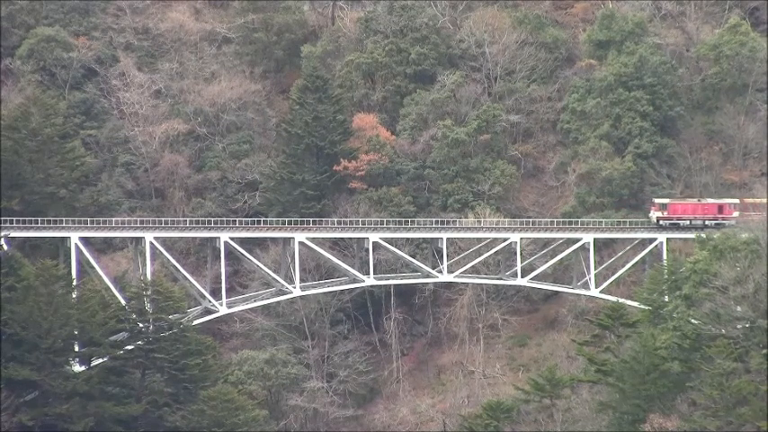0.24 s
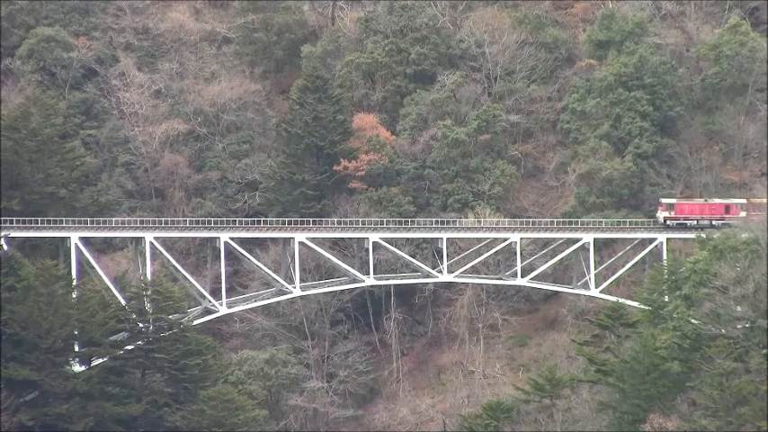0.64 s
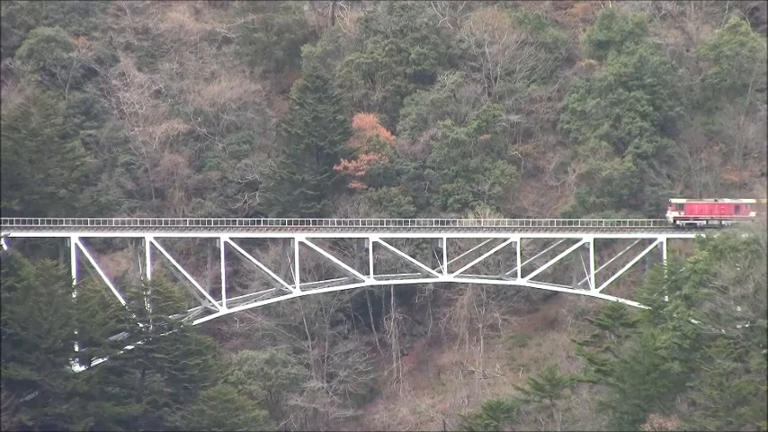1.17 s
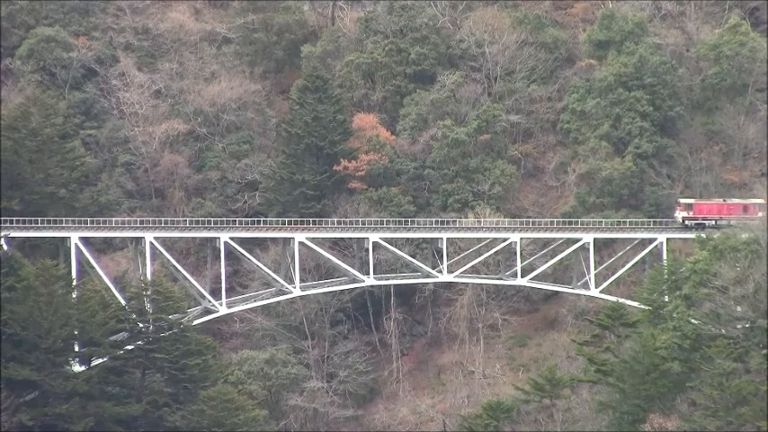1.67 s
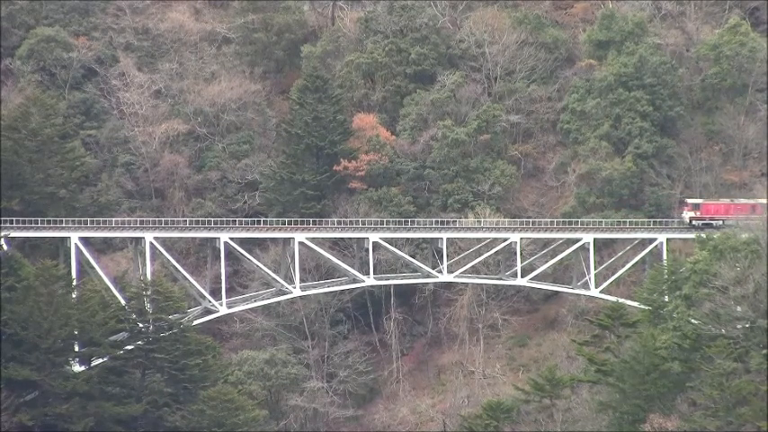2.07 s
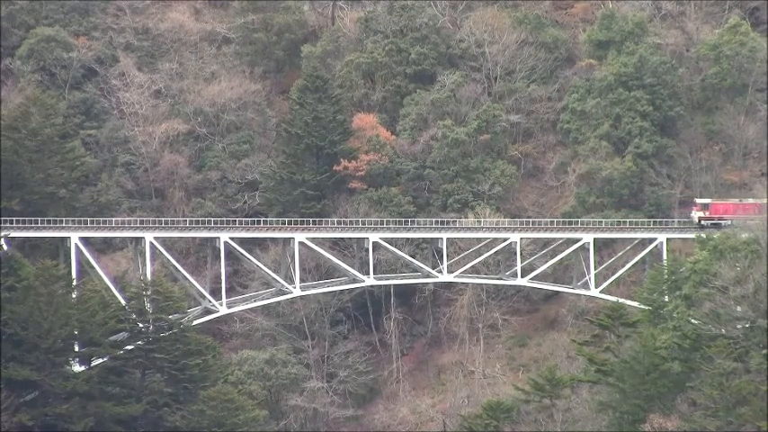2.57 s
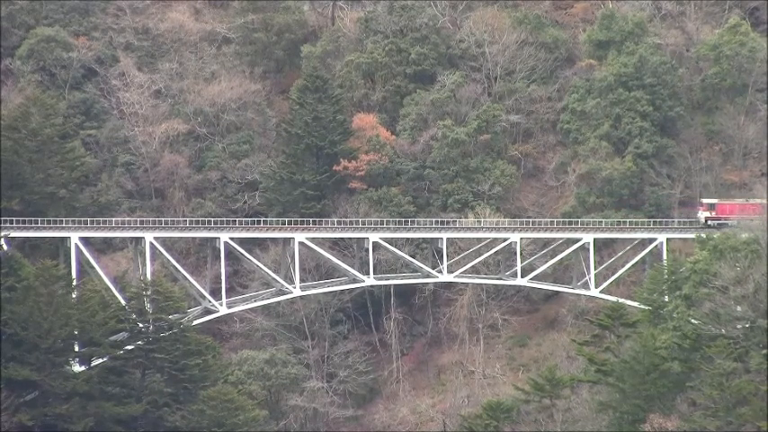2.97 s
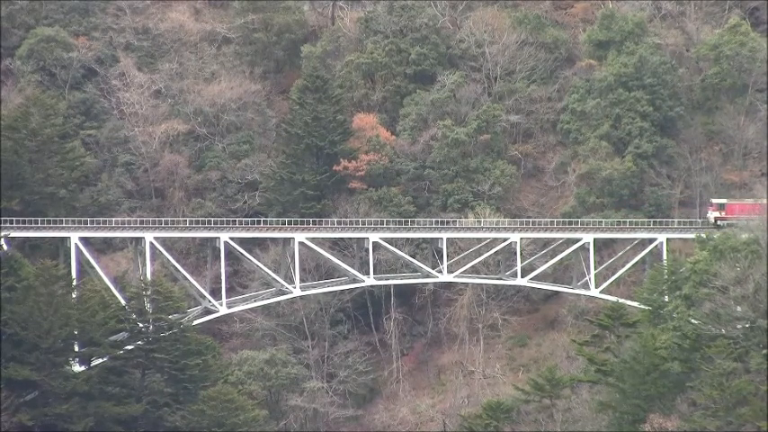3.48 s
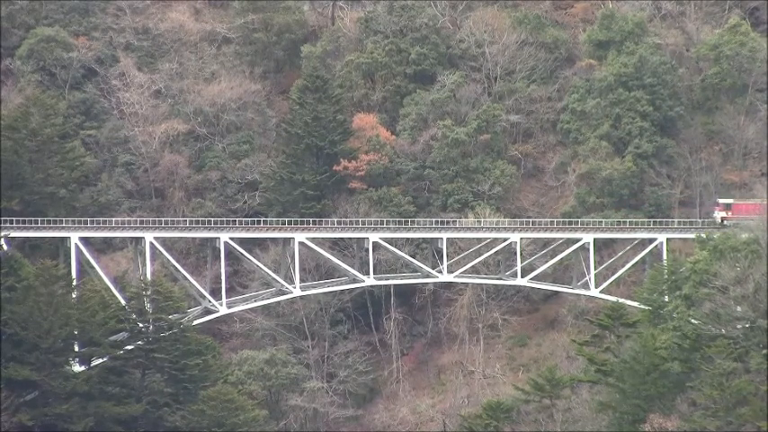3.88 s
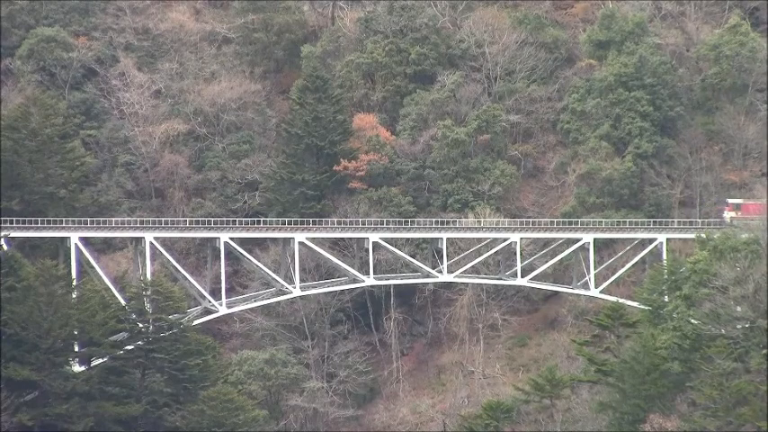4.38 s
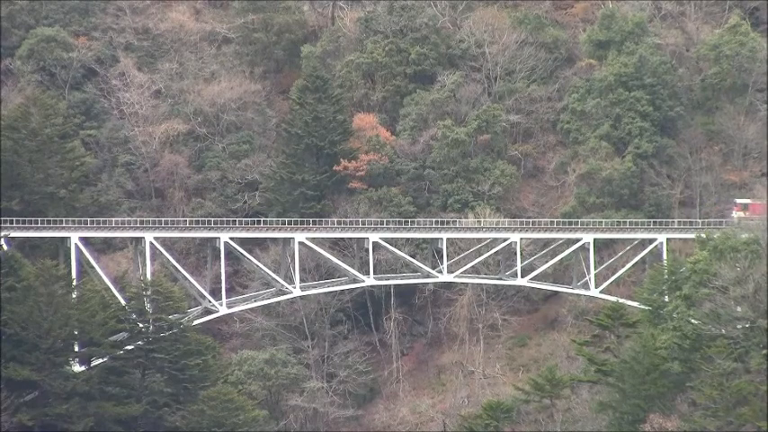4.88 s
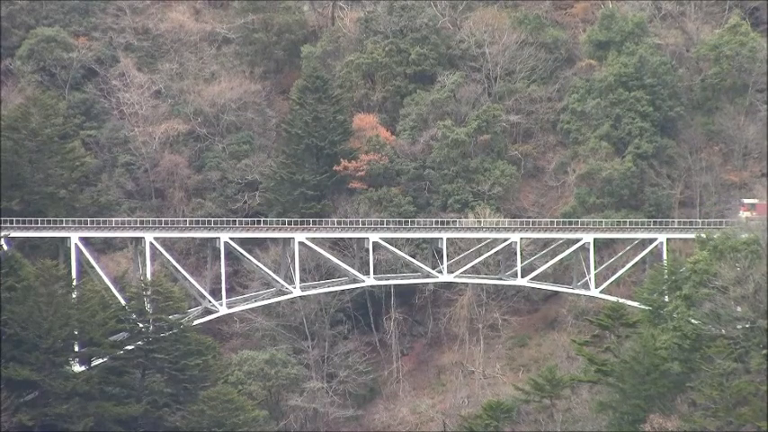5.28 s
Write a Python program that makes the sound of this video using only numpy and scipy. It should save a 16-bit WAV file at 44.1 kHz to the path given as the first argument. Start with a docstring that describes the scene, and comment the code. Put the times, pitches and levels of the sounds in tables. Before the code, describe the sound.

In a wooded valley, distant water rushes steadily, birds chirp with a soft echo and a far train drones very faintly. Close to the microphone, a reflex camera takes three evenly spaced pictures, each a sharp shutter clack with a brief motor whine. Gear knocks and a jacket rustles, a button clicks, and a latch snaps loudly shut. Everything turns quieter as a sleeve swishes amid more rustling and knocking.

```python
"""Distant water rushes in a wooded valley, a far train drones faintly, and birds call throughout.
Close by, a reflex camera takes three pictures: each time the mirror swings up, the shutter slams
and a motor winds on. Then gear knocks as it is handled and a jacket rustles. A button clicks and
a latch snaps shut, so loudly that the recorder turns itself down. Last, a sleeve swishes amid
more rustling and knocking."""
import sys
import numpy as np
from scipy import signal
from scipy.fft import rfft, irfft, next_fast_len
from scipy.io import wavfile
from scipy.ndimage import uniform_filter1d

SR = 44100
rng = np.random.default_rng(int(sys.argv[2]) if len(sys.argv) > 2 else 0)


def bounce(signal):
    """Save signal as a 16-bit WAV file at the path given by the first command-line argument."""
    frames = np.transpose(np.atleast_2d(signal))
    limited = np.clip(frames, -1, 1)
    pcm = np.round(limited * 32767).astype(np.int16)
    wavfile.write(sys.argv[1], SR, pcm)


N = 244297
TIME = np.arange(N) / SR
BLOW = TIME[:SR // 8]   # seconds since a blow

# How alike the two ears hear far and near sounds. Each row: frequency in Hz, likeness (1 = the same).
FAR = [(30, 0.93), (120, 0.64), (250, 0.34), (600, 0.42), (2000, 0.81), (5000, 1), (9000, 0.44),
       (15000, 0.11)]
NEAR = [(300, 1), (2000, 1), (4500, 0.97), (8000, 0.64), (14000, 0.13)]
# Tone of rattling springs and blades. Each row: frequency in Hz, level in dB.
RATTLE_TONE = [(240, -55), (400, -20.5), (879, -5.5), (1420, -8), (1650, 0), (2250, -4.5), (3020, -4.5),
               (3810, -6), (4650, -15), (5690, -5.5), (7400, -12.5), (14400, -24.5), (16000, -38.5)]
# Tone of camera parts grinding together. Each row: frequency in Hz, level in dB.
GRIND_TONE = [(350, -46), (600, -17), (2870, -4.5), (3480, 0), (4280, -8), (5120, -4), (5870, -10.5),
              (6550, -4), (8270, -16), (9110, -11), (14500, -27), (16000, -33.5)]
# Tone of a dry crack in gear or cloth. Each row: frequency in Hz, level in dB.
CRACK_TONE = [(250, -11), (700, -1.5), (1700, 1.5), (3500, -5), (6000, -11), (9000, -18), (15000, -35)]
# Movements in the jacket. Each row: start and length in seconds, then rubbing, pop and crack levels in dB.
MOVES = [(2.37, .25, -47, -32, -34.5), (2.86, .19, -56, -36, -35), (4.29, .26, -40.5, -26.5, -33),
         (4.91, .63, -46, -23, -32.5)]
MOVE_ATTACK_S, MOVE_RELEASE_S = .5, .62


def from_db(db):
    """Turn decibels into a number to multiply a sound by."""
    return 10 ** (np.asarray(db) / 20)


def rms_one(x):
    """Scale a sound so that its average power is 1."""
    return x / np.sqrt(np.mean(x ** 2) + 1e-20)


def at_hz(points, hz):
    """Read between the rows of a frequency table, giving each octave equal room."""
    known_hz, value = np.transpose(points)
    return np.interp(np.log(hz + 1e-3), np.log(known_hz), value)


def add(out, sound, s):
    """Mix a sound in, starting at s seconds."""
    at = int(np.clip(round(s * SR), 0, N - 1))
    out[..., at:at + sound.shape[-1]] += sound[..., :N - at]


def envelope(t, start, hold, attack, release, db):
    """A level that climbs 60 dB in `attack` seconds up to the start, holds, then falls 60 dB in `release`."""
    away = np.maximum(start - t, 0) / attack + np.maximum(t - start - hold, 0) / release
    return from_db(db - 60 * np.minimum(away, 3))


def drift(rate_hz, size=N):
    """A smooth random wander, about 1 in size; a higher rate wanders faster."""
    step = max(int(SR / rate_hz / 12), 1)
    memory = np.exp(-2 * np.pi * rate_hz * step / SR)
    white = rng.standard_normal(size // step + 42)
    slow = signal.lfilter([1], [1, -2 * memory, memory * memory], white)[40:]
    return np.interp(np.arange(size) / step, np.arange(len(slow)), rms_one(slow))


def colour(pair, tone, likeness):
    """Give two unrelated noises a tone and blend them into left and right, at power 1."""
    length = pair.shape[-1]
    size = next_fast_len(length)
    hz = np.fft.rfftfreq(size, 1 / SR)
    mid, side = rfft(pair, size) * from_db(at_hz(tone, hz))
    alike = np.clip(at_hz(likeness, hz), -1, 1)
    left_right = np.sqrt(1 + alike) * mid + np.sqrt(1 - alike) * side * [[1], [-1]]
    return rms_one(irfft(left_right, size)[:, :length])


def noise(tone, likeness, size=N):
    """Smooth stereo noise with the given tone."""
    return colour(rng.standard_normal((2, size)), tone, likeness)


def grains(per_s, spread_db, size=N):
    """Friction: tiny slips of uneven size at random moments, in two unrelated streams."""
    out = np.zeros(2 * size)
    count = max(int(2 * per_s * size / SR), 1)
    when, heft, side = rng.random(size=(count, 3)).T
    out[(when * len(out)).astype(int)] = np.sign(side - .5) * from_db(-spread_db * np.log(heft + .05))
    return out.reshape(2, size)


def water_and_train(water_db=-44):
    """Distant water rushes steadily under the wavering drone of a far train."""
    # Tone of the water. Each row: frequency in Hz, level in dB.
    water_tone = [(13, -35), (22, -9), (50, -5), (74, 1.5), (115, -1.5), (242, 0), (319, -2), (602, -4),
                  (1100, -7.5), (1380, -10), (2450, -10), (2740, -10), (4260, -15), (5770, -17),
                  (13200, -25), (16000, -30.5)]
    # The train's low notes. Each row: pitch in Hz, level in dB.
    train_notes = [(67, -67), (159, -60.5), (232, -59.5)]
    train = sum(from_db(db) * drift(2.9) * np.sqrt(2) * np.sin(2 * np.pi * hz * TIME)
                for hz, db in train_notes)
    return from_db(water_db) * noise(water_tone, FAR) + train


def call(length, hz, glide, rough, droop=.035, third_db=-15, fourth_db=-22):
    """One hoarse, gliding whistle that droops at both ends; its second harmonic carries the pitch."""
    along = np.linspace(-1, 1, max(int(length * SR), 64))
    arch = 1 - droop * along ** 2
    pitch = hz * 2 ** (glide * along / 2) * arch * (1 + rough * drift(450, len(along)))
    phase = np.pi * np.cumsum(pitch) / SR   # turns at half the pitch
    voice = np.sin(2 * phase) + from_db(third_db) * np.sin(3 * phase)
    voice += from_db(fourth_db) * np.sin(4 * phase) * (pitch < 4000)
    flutter = from_db(3 * drift(120, len(along)))
    return rms_one(voice * flutter) * np.abs(np.cos(np.pi * along / 2)) ** .43


def valley(sound, echo_db, fade_s=.8):
    """Wooded slopes add a blurred echo that dies away by 60 dB in fade_s."""
    t = TIME[:SR]
    echo = noise([(20, 0), (20000, 0)], FAR, SR) * from_db(-60 * t / fade_s) * (1 - np.exp(-t / .02))
    echo /= np.sqrt(np.sum(echo ** 2) / 2)
    return sound + from_db(echo_db) * signal.oaconvolve(sound[None], echo, axes=1)[:, :N]


def birds(thin_hz=7520, thin_db=-53):
    """Nearer birds call one by one, and the valley echoes them."""
    # Each row: start and length in seconds, middle pitch in Hz, glide in octaves, level in dB.
    bird_calls = [(0, .056, 4740, .12, -40), (.041, .044, 3370, -.19, -39.5), (.124, .046, 3370, .05, -44),
                  (.252, .12, 3980, .5, -44), (.345, .089, 3550, .03, -44), (.94, .086, 4700, .25, -45),
                  (.984, .11, 3080, 0, -45), (1.122, .055, 5270, .4, -44), (1.15, .062, 3520, .05, -39),
                  (1.437, .2, 3900, .25, -47), (1.632, .096, 4150, 0, -41.5), (1.92, .12, 3060, -.15, -46),
                  (2.078, .079, 5300, .45, -51), (2.28, .04, 1830, .1, -45), (2.398, .064, 3920, 0, -45.5),
                  (3.141, .075, 3420, -.08, -46.5), (3.726, .088, 3590, .07, -45.5),
                  (4.415, .067, 4600, .19, -45), (4.45, .06, 3490, .04, -44), (4.777, .097, 3530, .24, -39),
                  (5.256, .087, 2820, 0, -48), (5.36, .096, 2900, .18, -44), (5.462, .03, 4450, -.45, -45)]
    calls = np.zeros(N)
    for s, length, hz, glide, db in bird_calls:
        add(calls, from_db(db) * call(length, hz, glide, rough=.028), s)
    for k in range(3):   # a small bird repeats one thin note, a little lower each time
        note = call(length=.09, hz=thin_hz - 130 * k, glide=0, rough=.009, droop=.025, third_db=-40)
        add(calls, from_db(thin_db) * note, s=.25 + .158 * k)
    return valley(calls, echo_db=-4.5)


def flock(lowest_hz=2620, octaves=.9, count=330):
    """Far birds overlap into a blur of echoes that swells with each bout of chatter."""
    # Each row: start in seconds, length in seconds, level in dB.
    bouts = [(0, .36, -45.7), (1, .7, -48), (2.3, .15, -47.7), (4.5, .12, -49), (4.95, .55, -54)]
    calls = np.zeros(N)
    for k, (late, pitch, slope) in enumerate(rng.random(size=(count, 3))):
        note = call(length=.06, hz=lowest_hz * 2 ** (octaves * pitch), glide=.4 * slope, rough=.06)
        add(calls, note, (k + late) / count * N / SR)
    swell = sum(envelope(TIME, s, length, attack=1.3, release=1.5, db=db) for s, length, db in bouts)
    return rms_one(valley(calls, echo_db=8)) * swell


def ringing(notes, sense, top_hz=10000):
    """A struck body rings at its own notes; a negative sense makes neighbouring notes swing opposite ways."""
    swing = sum(sense ** k * from_db(db - 60 * BLOW / fade_s) * np.sin(2 * np.pi * hz * BLOW)
                for k, (hz, db, fade_s) in enumerate(notes))
    # a small body gives off little below its lowest note; a blow takes time, which dulls the treble
    band_hz = [.8 * notes[0][0], top_hz]
    return signal.sosfilt(signal.butter(3, band_hz, "band", fs=SR, output="sos"), swing)


def strike(contacts, ring, tone, rattle_s, tail_db, tail_s, start=0):
    """Each contact rings the body and shakes loose parts; ground and bushes scatter a faint tail."""
    out = np.zeros((2, N))
    dying = from_db(-60 * BLOW / rattle_s) + from_db(tail_db - 60 * BLOW / tail_s)
    for s, ring_db, rattle_db, direction in contacts:
        rattle = noise(tone, NEAR, len(BLOW)) * dying
        add(out, np.sign(direction) * from_db(ring_db) * ring + from_db(rattle_db) * rattle, start + s)
    return out


def camera(lead_s=.12):
    """The mirror swings up and lands, the shutter slams, the motor winds on; every shot has the same blows."""
    # The pictures. Each row: shutter time in seconds, level of the blows in dB.
    shots = [(.7526, -1), (1.252, -1), (1.7408, -1.5)]
    # Blows in one shot. Each row: seconds after the shutter, ring in dB, rattle in dB, direction (1 or -1).
    contacts = [(-.073, -36.5, -37, 1), (-.0575, -29.5, -24.5, 1), (-.0525, -27.5, -40, -1),
                (-.0455, -13, -20.5, 1), (-.0400, -11.5, -18, -1), (-.0048, -18, -34, 1), (0, 0, -17, 1),
                (.00436, 4, -17, -1), (.043, -36, -34, 1), (.073, -18, -33, 1), (.129, -17, -29, 1)]
    # Notes of the camera body. Each row: pitch in Hz, level in dB, seconds to fade by 60 dB.
    body_notes = [(500, -33, 0.02), (750, -30, 0.014), (1070, -18.5, 0.0088), (1470, -13, .014),
                  (1690, -18.5, .014), (2540, -18, 0.023), (3230, -25, 0.015), (3600, -37.5, 0.0092),
                  (5160, -24.5, 0.014), (6500, -35, .009)]
    out = np.zeros((2, N))
    ring = ringing(body_notes, sense=-.99)
    blows = strike(contacts, ring, RATTLE_TONE, rattle_s=.023, tail_db=-18, tail_s=.12, start=lead_s)
    mirror_swing = envelope(BLOW - lead_s, start=-.058, hold=.017, attack=.12, release=.07, db=-34.5)
    for s, db in shots:
        friction = colour(grains(per_s=4000, spread_db=4, size=len(BLOW)), GRIND_TONE, NEAR)
        add(out, friction * mirror_swing, s - lead_s)
        add(out, from_db(db) * blows[:, :SR // 2], s - lead_s)
        add(out, motor(), s)
    return out


def motor(whine_hz=5130, gear_ratio=1.49, sag=.16, cocked_s=.113):
    """Two pairs of gears whine and their teeth grind; cocking the spring drags the pitch down."""
    t = TIME[:SR // 4]
    load_width_s = np.where(t < cocked_s, .018, .03)   # the load builds faster than it lets go
    load = np.exp(-((t - cocked_s) / load_width_s) ** 2)
    pitch = whine_hz * (1 - sag * load) * (1 + .021 * drift(400, len(t)))
    phase = 2 * np.pi * np.cumsum(pitch) / SR
    low = np.sin(phase) + from_db(-11) * np.sin(phase / 2) + from_db(-16) * np.sin(2 * phase)
    low *= envelope(t, start=.08, hold=.018, attack=.04, release=.11, db=-31.5)
    high = np.sin(gear_ratio * phase)
    high *= envelope(t, start=.104, hold=.021, attack=.02, release=.075, db=-30)
    teeth = colour(grains(per_s=5000, spread_db=4.6, size=len(t)), GRIND_TONE, NEAR)
    teeth *= envelope(t, start=.087, hold=.056, attack=.23, release=.12, db=-32.6)
    return np.sqrt(2) * (low + high) + teeth


def thud(hz, cycles=4.6):
    """A swing that dies away by 60 dB in the given number of cycles."""
    t = BLOW[:SR // 25]
    return np.sin(2 * np.pi * hz * t) * from_db(-60 * t * hz / cycles) * (1 - np.exp(-4 * t * hz))


def pop(hz, snap_db=-5, snap_ratio=3.13):
    """A dull thud with a briefer, higher snap on top."""
    return thud(hz) + from_db(snap_db) * thud(snap_ratio * hz)


def crack(fade_s):
    """A dry burst of noise that dies away by 60 dB in fade_s."""
    t = BLOW[:SR // 25]
    return noise(CRACK_TONE, NEAR, len(t)) * from_db(-60 * t / fade_s)


def handling(low_hz=330, high_hz=720, clack_hz=1740, clack_s=.02):
    """Handled gear knocks with a pop and a crack; twice a loose part clacks and bounces."""
    # Each row: start in seconds, pop level in dB, crack level in dB.
    knocks = [(2.245, -49, -28.5), (2.5368, -28, -31), (2.89, -38, -34), (4.2651, -39, -26),
              (4.2865, -30, -25), (4.5703, -28, -26), (4.6588, -22, -28), (4.9403, -25, -24),
              (4.9461, -16, -27), (4.9593, -23, -19.5), (5.053, -20, -33), (5.0758, -18, -29),
              (5.101, -19, -35), (5.19, -23, -25), (5.213, -21, -30), (5.3185, -21, -35), (5.335, -19, -32),
              (5.4125, -19.5, -37)]
    # Each row: start in seconds, level in dB.
    clacks = [(3.701, -29), (3.7068, -31), (4.563, -29), (4.567, -29)]
    out = np.zeros((2, N))
    for (s, pop_db, crack_db), pitch in zip(knocks, rng.random(len(knocks))):
        hz = low_hz * (high_hz / low_hz) ** pitch
        add(out, from_db(pop_db) * pop(hz) + from_db(crack_db) * crack(fade_s=.008), s)
    for s, db in clacks:
        add(out, from_db(db) * thud(clack_hz, cycles=clack_hz * clack_s), s)
    return out


def folds(low_hz=280, high_hz=1150, gap_s=.021, spread_db=3.5, pan_db=2.5, count=280):
    """While the jacket moves, its folds buckle one after another, each with a pop and a small crack."""
    out = np.zeros((2, N))
    wait, pitch = rng.random(size=(count, 2)).T
    size, side = rng.standard_normal((count, 2)).T
    times = MOVES[0][0] - MOVE_ATTACK_S + np.cumsum(gap_s * (.25 + 1.5 * wait))
    sizes = from_db(spread_db * np.minimum(size, 1.5))
    hz = low_hz * (high_hz / low_hz) ** pitch
    pops = sum(envelope(times, s, hold, MOVE_ATTACK_S, MOVE_RELEASE_S, db) for s, hold, _, db, _ in MOVES)
    cracks = sum(envelope(times, s, hold, MOVE_ATTACK_S, MOVE_RELEASE_S, db) for s, hold, *_, db in MOVES)
    for k in np.flatnonzero(times < TIME[-1]):
        fold = pops[k] * pop(hz[k]) + cracks[k] * crack(fade_s=.007)
        left_right = from_db(pan_db * side[k] * np.array([[.5], [-.5]]))
        add(out, sizes[k] * fold * left_right, times[k])
    return out


def rubbing():
    """Fabric catches on fabric in gritty clumps during each movement."""
    # Tone of rubbed cloth. Each row: frequency in Hz, level in dB.
    cloth_tone = [(120, -23), (350, -1.5), (1000, -4), (2500, -8), (5000, -12), (8000, -20.5), (15000, -36)]
    effort = sum(envelope(TIME, s, hold, MOVE_ATTACK_S, MOVE_RELEASE_S, db) for s, hold, db, *_ in MOVES)
    clumps = from_db(2.6 * drift(90))
    return colour(grains(per_s=3500, spread_db=3.7), cloth_tone, NEAR) * clumps * effort


def button():
    """A light press makes a button click and ring."""
    # Each row: start in seconds, ring in dB, rattle in dB, direction of the blow.
    contacts = [(3.4714, 2.5, -33, 1), (3.4757, 2.5, -33.5, 1), (3.48, -14, -46, 1)]
    # Each row: pitch in Hz, level in dB, seconds to fade by 60 dB.
    button_notes = [(1500, -40, 0.011), (2243, -31.5, .03), (3440, -41, .02), (4800, -31, 0.011),
                    (6550, -41.5, .03), (6830, -44, .03)]
    ring = ringing(button_notes, sense=.97)
    return strike(contacts, ring, RATTLE_TONE, rattle_s=.017, tail_db=-28, tail_s=.08)


def latch():
    """A latch snaps shut in a quick cluster of blows, ringing and rattling."""
    # Each row: start in seconds, ring in dB, rattle in dB, direction of the blow.
    contacts = [(3.65788, 4.5, -19, 1), (3.65824, 7.5, -19, 1), (3.6593, -3, -13.5, 1),
                (3.6625, -22, -23, -1), (3.6652, -22, -22, 1)]
    # Each row: pitch in Hz, level in dB, seconds to fade by 60 dB.
    latch_notes = [(2050, -28, 0.011), (2900, -29, 0.0116), (3770, -12, 0.0073), (5210, -14.5, 0.011),
                   (5800, -9.5, 0.0043), (6250, -11, 0.008), (8000, -16.5, 0.0032), (13800, -42, .008)]
    # Tone of its rattle. Each row: frequency in Hz, level in dB.
    latch_tone = [(530, -53), (900, -28), (1700, -15), (2020, -10), (3110, -18), (3640, -1), (5750, -12.5),
                  (6640, -4), (7310, -5), (13800, -22.5), (16000, -28)]
    ring = ringing(latch_notes, sense=.91)
    return strike(contacts, ring, latch_tone, rattle_s=.023, tail_db=-28, tail_s=.22)


def sleeve():
    """A sleeve slides once with a bright, grainy swish."""
    # Each row: frequency in Hz, level in dB.
    swish_tone = [(710, -32.5), (1200, -4), (3620, -10), (4800, 1), (9210, -4), (11100, -7), (13900, -7),
                  (16000, -15)]
    unevenness = from_db(1.8 * drift(110))
    slide = envelope(TIME, start=4.33, hold=.05, attack=.22, release=.3, db=-36.5)
    return colour(grains(per_s=7000, spread_db=3.42), swish_tone, FAR) * unevenness * slide


def scene():
    """Near things sit a touch to the left, with the valley all around."""
    near = camera() + button() + latch() + handling() + folds() + rubbing() + sleeve()
    lean_left = from_db([[.58], [-.58]])
    return near * lean_left + birds() + flock() + water_and_train()


def record(dry, threshold_db=-10, recover_db_per_s=.5, look_ahead_s=.024, cutoff_hz=16800):
    """The recorder turns down just before the snap and recovers slowly; it rounds peaks and cuts the top."""
    power = uniform_filter1d(np.mean(dry ** 2, axis=0), size=90)
    over_db = np.maximum(10 * np.log10(np.abs(power) + 1e-12) - threshold_db, 0)
    held_db = np.maximum.accumulate(over_db + recover_db_per_s * TIME) - recover_db_per_s * TIME
    cut_db = uniform_filter1d(np.interp(TIME + look_ahead_s, TIME, held_db), size=600)
    ducked = dry * from_db(-cut_db)
    rounded = ducked / (1 + (ducked / .92) ** 8) ** (1 / 8)
    return signal.sosfilt(signal.cheby2(16, 70, cutoff_hz, fs=SR, output="sos"), rounded)


dry = scene()
out = record(dry)
bounce(out)
```